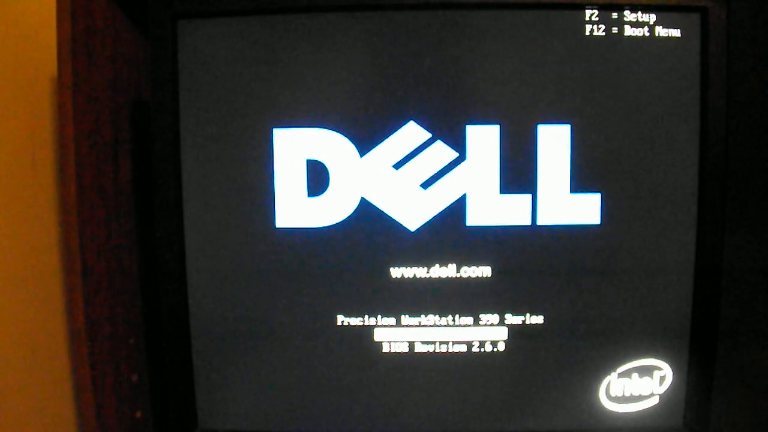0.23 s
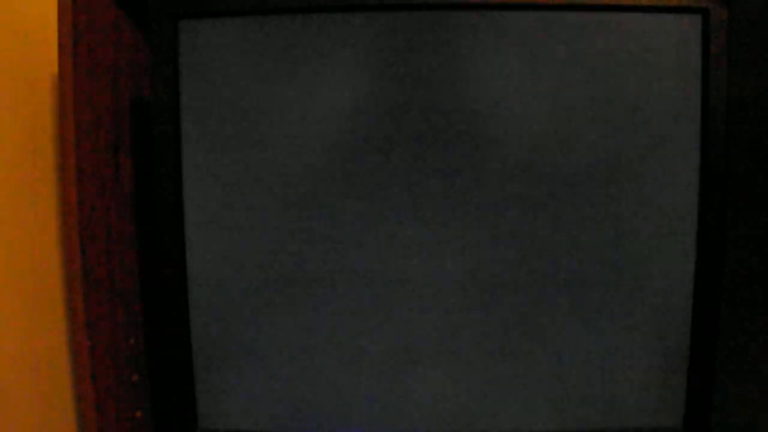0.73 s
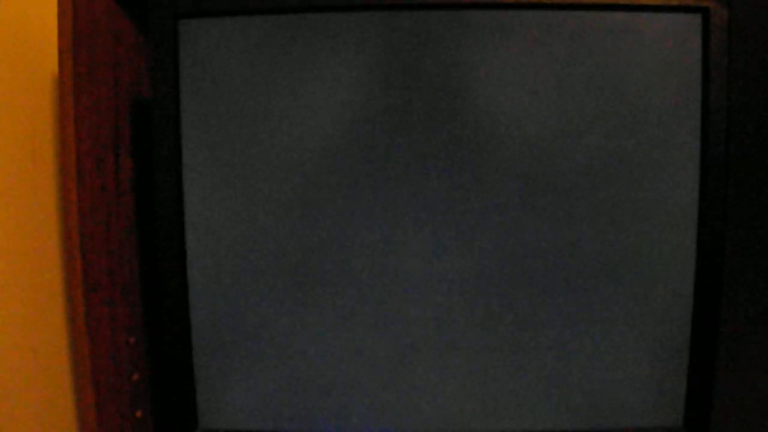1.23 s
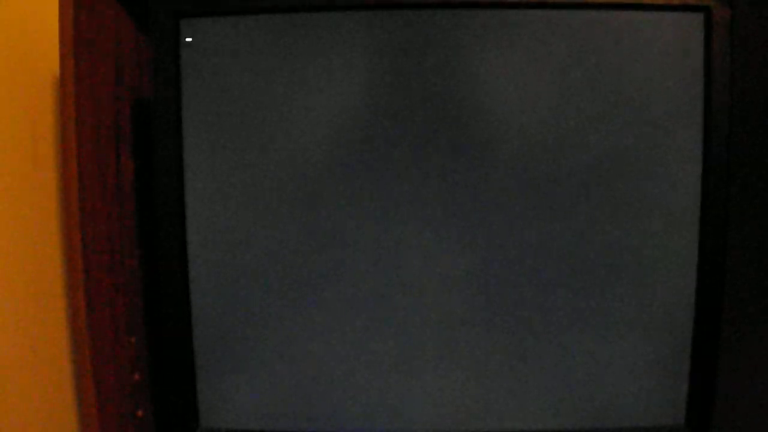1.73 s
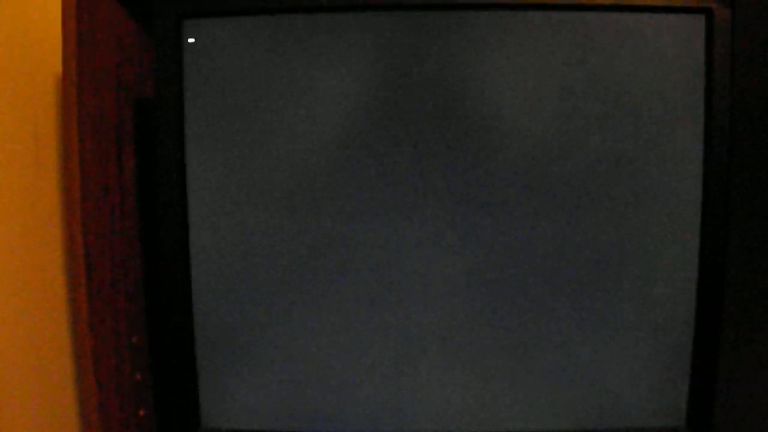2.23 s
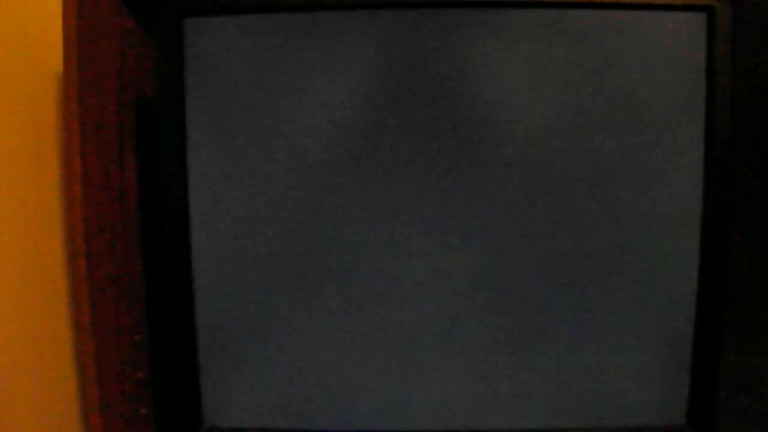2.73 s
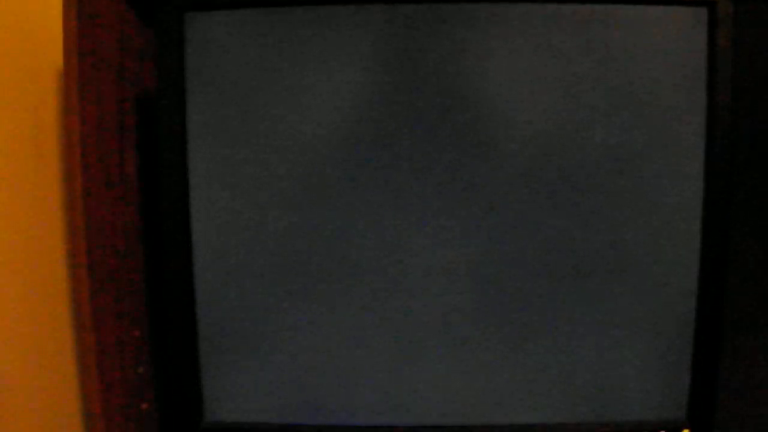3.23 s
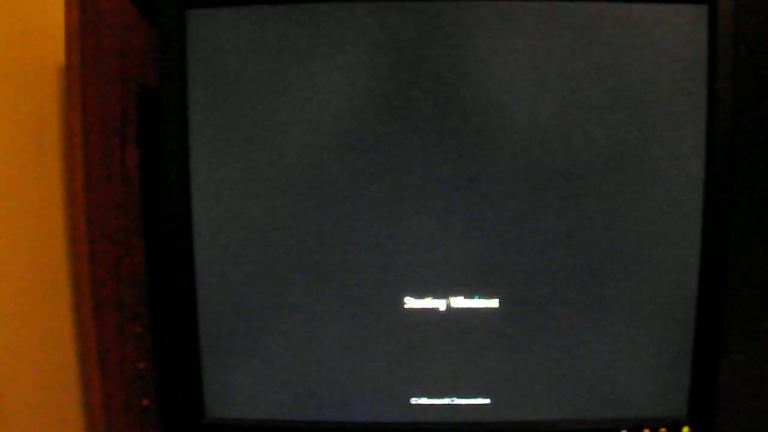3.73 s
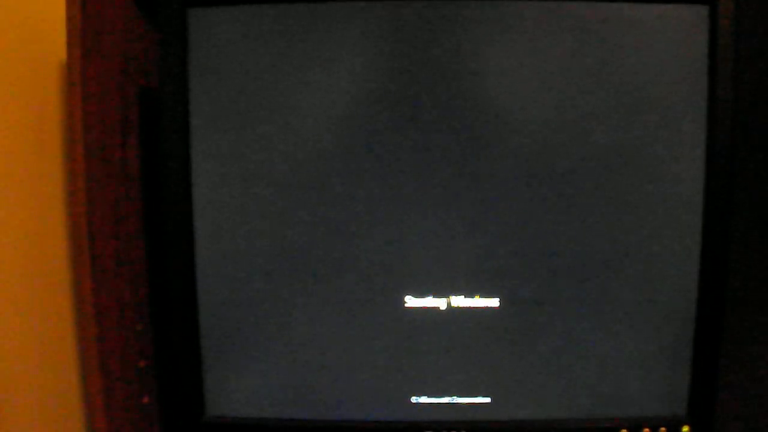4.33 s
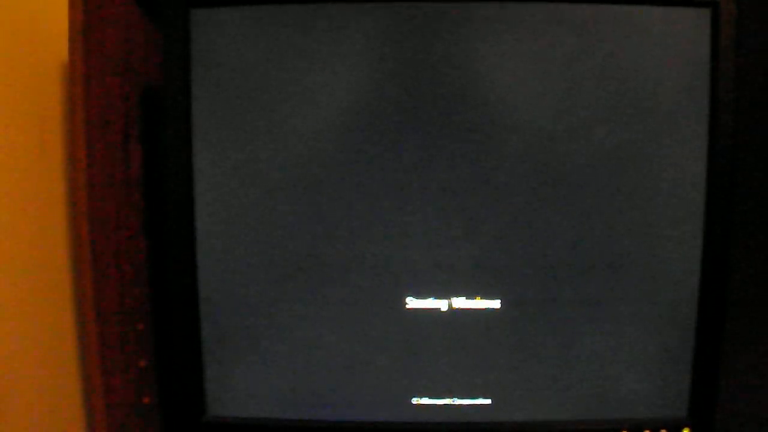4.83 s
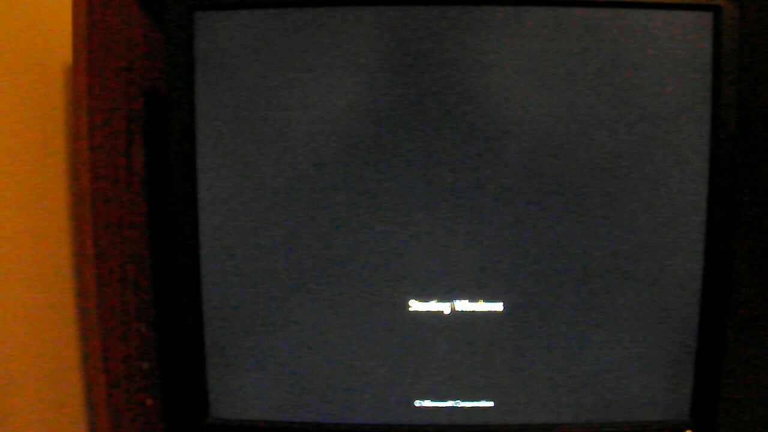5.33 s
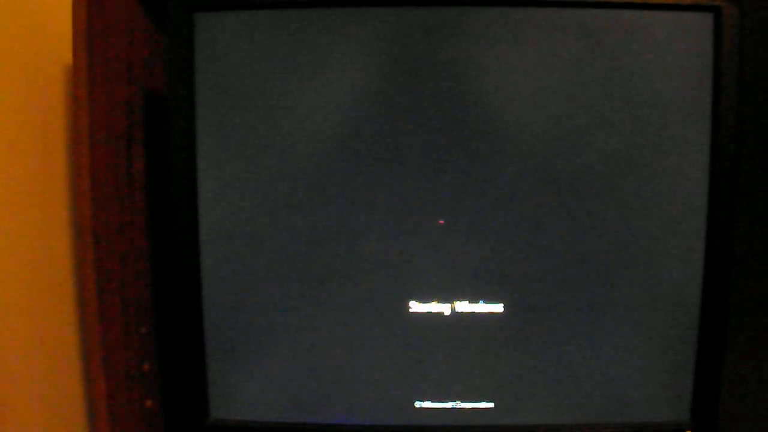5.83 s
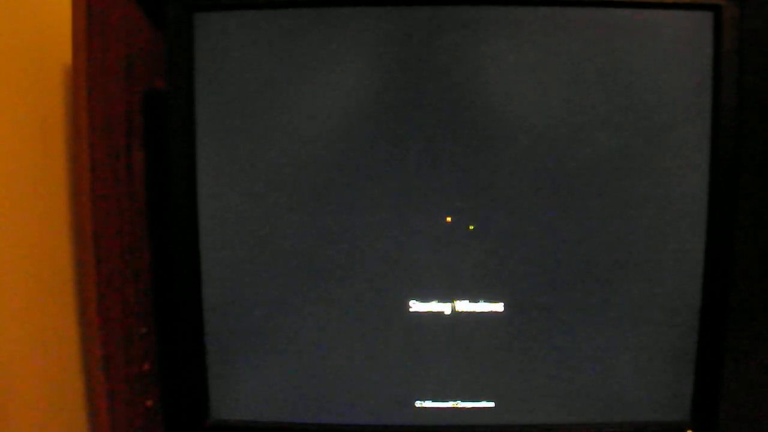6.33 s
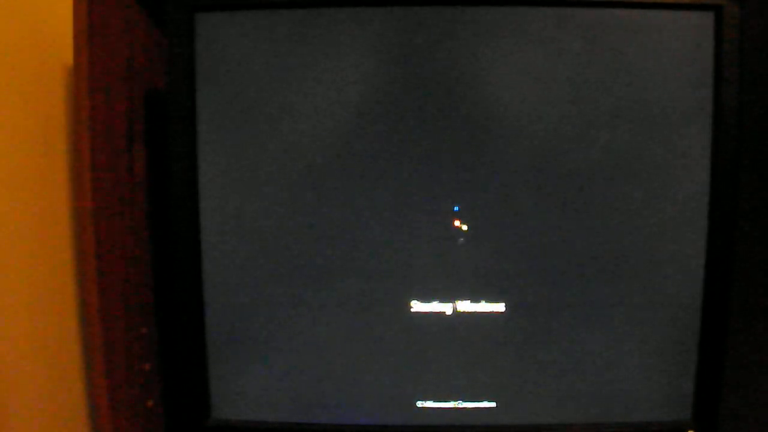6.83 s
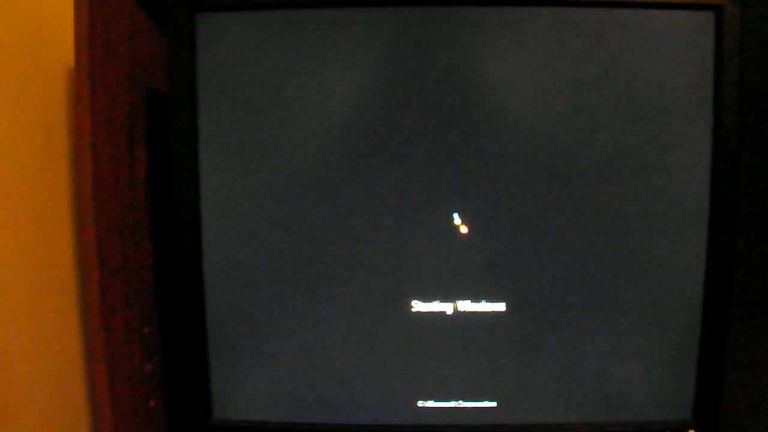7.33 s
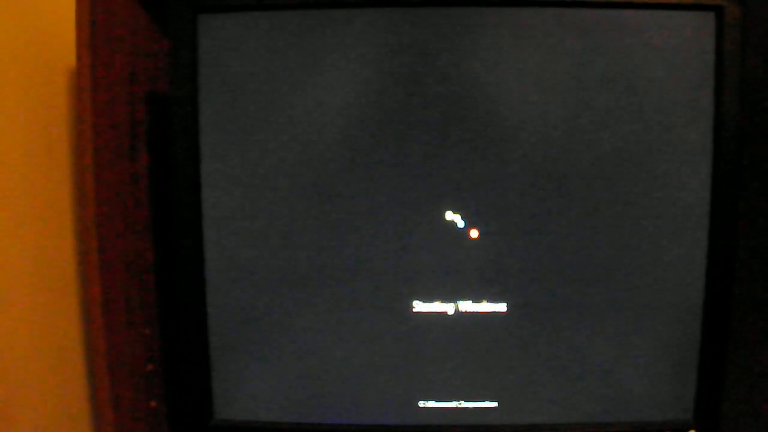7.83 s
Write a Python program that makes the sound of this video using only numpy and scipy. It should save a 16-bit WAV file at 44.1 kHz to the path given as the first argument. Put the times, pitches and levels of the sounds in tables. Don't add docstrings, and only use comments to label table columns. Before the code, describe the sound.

Steady computer fan noise with low rumble and thin whine, soft disk ticks, a few plastic knocks, then a sliding tray snapping shut.

```python
import sys
import numpy as np
from scipy import signal
from scipy.fft import rfft, irfft
from scipy.io import wavfile
from scipy.ndimage import uniform_filter1d

SR = 44100
rng = np.random.default_rng(int(sys.argv[2]) if len(sys.argv) > 2 else 0)


def how_loud(loudness_db):
    steps = np.asarray(loudness_db, float) / 20
    return 10 ** steps


def store_wav(level_fs):
    pcm = np.round(np.clip(np.atleast_2d(level_fs), -1, 1) * 32767)
    wavfile.write(sys.argv[1], SR, pcm.T.astype(np.int16))


N = 355887


def evened(x):
    return x / np.sqrt(np.mean(x ** 2) + 1e-20)


def curve(rows, column):
    rows = np.asarray(rows)
    return np.interp(np.arange(N) / SR, rows[:, 0], rows[:, column])


def hold(start_s, length_s, edge_s):
    t = np.arange(0, N / SR, .001)
    nearest_edge_s = np.minimum(t - start_s, start_s + length_s - t)
    return np.sin(np.pi / 2 * np.clip(nearest_edge_s / edge_s + .5, 0, 1)) ** 2


def spread(slow):
    return np.interp(np.arange(N) / SR * 1000, np.arange(len(slow)), slow)


def add(mix, start_s, sound):
    part = mix[round(start_s * SR):][:len(sound)]
    part += sound[:len(part)]


def coloured(points, band):
    hz = np.fft.rfftfreq(N, 1 / SR)
    point_hz, point_db = np.transpose(points)
    gain = how_loud(np.interp(np.log(hz + 1), np.log(point_hz + 1), point_db))
    gain = gain * (hz >= band[0]) * (hz < band[1])
    return evened(irfft(gain * rfft(rng.standard_normal(N)), N))


def resonate(x, hz, width_hz):
    turn = np.exp(2j * np.pi * np.cumsum(hz * np.ones(len(x))) / SR)
    r = np.exp(-np.pi * abs(width_hz) / SR)
    smooth = signal.lfilter([(1 - r) ** 2], [1, -2 * r, r * r], x / turn)
    return 2 * (turn * smooth).real


def ring(modes, rise_s):
    t = np.arange(6000) / SR
    body = sum(how_loud(db - 60 * t / t60_s) * np.sin(2 * np.pi * hz * t) for hz, db, t60_s in modes)
    sound = body * (1 - np.exp(-(t / rise_s) ** 2))
    return sound / abs(sound).max()


def burst(bands, rise_s, t60_s):
    t = np.arange(6000) / SR
    puff = rng.standard_normal(6000) * (1 - np.exp(-t / rise_s)) * how_loud(-60 * t / t60_s)
    sound = sum(how_loud(db) * resonate(puff, hz, width) / np.sqrt(width) for hz, width, db in bands)
    return sound / abs(sound).max()


def room_modes():
    # frequency_hz, density_db
    rumble = [(4, -27), (12, -13), (18, -8), (23, 0), (29, -15), (48, -12), (56, -8.5), (66, -22),
              (78, -24.5), (98, -28.5), (126, -30), (134, -27), (144, -38.5), (160, -44.5)]
    # from_hz, to_hz, level_db
    between = [(6, 14, -32), (28.6, 43, -38), (64, 70, -46)]
    # start_s, length_s, level_db
    low_surges = [(0.552, 0.041, -21), (0.863, 0.17, -20), (1.277, 0.29, -21.5), (2.128, 0.38, -22.5),
                  (2.639, 0.034, -21), (2.766, 0.06, -22), (3.142, 0.12, -22), (3.558, 0.069, -23.5),
                  (3.87, 0.057, -23.5), (4.07, 0.054, -21), (4.228, 0.093, -20.5), (4.406, 0.094, -22),
                  (4.655, 0.074, -23), (4.848, 0.038, -21.5), (5.105, 0.045, -23.5), (5.23, 0.031, -25),
                  (5.638, 0.18, -23), (5.89, 0.046, -21), (6.053, 0.03, -22), (6.189, 0.16, -22),
                  (6.662, 0.035, -21), (6.784, 0.039, -21.5), (7.019, 0.04, -21), (7.366, 0.16, -19),
                  (7.76, 0.28, -22)]
    # start_s, length_s, level_db
    second_surges = [(0.468, 0.189, -28), (0.887, 0.05, -30), (1.458, 0.034, -33), (1.593, 0.055, -26.5),
                     (1.949, 0.086, -30.5), (2.154, 0.2, -33), (2.414, 0.055, -27.5), (2.633, 0.064, -26.5),
                     (2.787, 0.07, -27), (2.996, 0.17, -26.5), (3.711, 0.31, -29), (4.231, 0.154, -32),
                     (4.461, 0.065, -34), (5.291, 0.11, -31), (5.511, 0.29, -29), (5.866, 0.089, -25.5),
                     (6.173, 0.034, -27), (6.46, 0.062, -29), (6.598, 0.029, -38), (6.718, 0.065, -27.5),
                     (6.887, 0.038, -32), (7.019, 0.057, -26.5), (7.153, 0.33, -28), (7.552, 0.084, -26.5),
                     (7.895, 0.12, -27.5)]
    out = how_loud(-44) * coloured(rumble, (70, 160))
    for from_hz, to_hz, level_db in between:
        out += how_loud(level_db) * coloured(rumble, (from_hz, to_hz))
    for band_hz, calm_db, surges in (((14, 29), -29.5, low_surges), ((43, 64), -35, second_surges)):
        flutter = coloured(rumble, band_hz)
        envelope = uniform_filter1d(abs(signal.hilbert(flutter)), size=3000)
        full = evened(flutter / (envelope + 0.25))
        shapes = [hold(start_s, length_s, 0.03) for start_s, length_s, _ in surges]
        calm = spread(1 - np.minimum(sum(shapes), 1))
        surge = spread(sum(how_loud(row[2]) * shape for row, shape in zip(surges, shapes)))
        out += how_loud(calm_db) * calm * (.5 * flutter + .5 * full)
        out += full * surge
    return out * np.minimum(.3 + np.arange(N) / SR / .03, 1)


def fans():
    # frequency_hz, density_db
    air = [(161, -1), (194, -5), (258, -6.5), (450, -12), (700, -15.5), (904, -16), (1023, -13),
           (1249, -16.5), (1453, -16), (1604, -12.5), (1798, -18.5), (1927, -13.5), (2089, -10),
           (2293, -12)]
    # frequency_hz, density_db
    grille = [(2304, -15), (2358, -14.5), (2412, -11), (2498, -11), (2675, -4), (2790, -15), (2850, -17),
              (2885, -8), (2982, -5.5), (3198, -8.5), (3413, 0), (3628, -4), (3725, -12), (3779, -20)]
    # frequency_hz, density_db
    vent = [(3790, -6), (3840, -2.5), (3919, -7.5), (3973, -1.5), (4016, -.5), (4360, -.5), (4813, -12.5),
            (5200, -11), (5685, -15), (5986, -15.5), (6492, -18)]
    # time_s, level_db
    gust = [
        (0, -0.5),
        (4, -1),
        (5.7, 0.1),
        (7.4, .7),
        (8.07, -0.5),
    ]
    gust_db = curve(gust, 1)
    rush = how_loud(-54.7) * coloured(air, (160, 2300))
    rush += how_loud(-47 + gust_db) * coloured(grille, (2300, 3780))
    rush += how_loud(-59 + .5 * gust_db) * coloured(vent, (3780, 6500))
    z = signal.stft(rush, nperseg=512, noverlap=384)[2]
    patches = uniform_filter1d(rng.standard_normal(z.shape), size=8, axis=0)
    patches = evened(uniform_filter1d(patches, size=16, axis=1))
    return signal.istft(z * how_loud(0.71 * patches), nperseg=512, noverlap=384)[1][:N]


def tones():
    # pitch_hz, level_db
    coils = [
        (2873.8, -64),
        (6017, -90),
        (11472.6, -85.5),
    ]
    # start_s, length_s, lift_db
    loads = [
        (.85, 2.85, 5),
        (6.12, 0.51, 7),
        (6.12, 0.86, 6),
    ]
    t = np.arange(N) / SR
    drifts_hz = np.geomspace(.5, 8, 12)
    wander = evened(sum(np.sin(2 * np.pi * (f * t + rng.random())) / np.sqrt(f) for f in drifts_hz))
    lift_db = spread(sum(db * hold(start_s, length_s, .1) for start_s, length_s, db in loads))
    hum = how_loud(-52.5 + lift_db + wander) * np.sin(2 * np.pi * 120.1 * t)
    whine = sum(how_loud(db) * np.sin(2 * np.pi * hz * t) for hz, db in coils)
    return np.sqrt(2) * (hum + whine)


def microphone_hiss():
    # frequency_hz, density_db
    hiss = [(3820, -31), (6500, -1), (10800, -1.5), (11500, -2), (12400, -4), (15100, -4.5), (15600, -4)]
    return how_loud(-66) * coloured(hiss, (6500, 16000))


def frame_leak():
    frame_hz, first_s, pulse_s, pair_s = 29.49529, .004757, .000563, .000687
    hz = np.arange(frame_hz, SR / 2, frame_hz)
    delay = lambda s: np.exp(-2j * np.pi * hz * s)
    edges = (1 - delay(pulse_s)) * (1 + how_loud(-2.5) * delay(pair_s)) * delay(first_s)
    cycle = 16384
    wave = irfft(np.r_[0, edges / (1 + (hz / 22000) ** 2)], cycle) * cycle * frame_hz / SR
    phase = np.arange(N) / SR * frame_hz % 1
    return how_loud(-40) * np.interp(phase * cycle, np.arange(cycle), wave)


def disk_seeks():
    # start_s, rms_db, length_s, pitch_hz
    seeks = [
        (.29, -57, .025, 4500),
        (0.462, -46, 0.058, 3420),
        (0.658, -52.5, 0.023, 3420),
        (0.764, -45, 0.066, 3300),
        (1.156, -47, 0.043, 3420),
        (1.457, -49, 0.044, 3410),
        (3.046, -49, 0.023, 3480),
        (3.871, -44.5, 0.034, 3460),
        (6.515, -41, 0.027, 3360),
        (7.375, -52, 0.024, 3400),
    ]
    out = np.zeros(N)
    for start_s, rms_db, length_s, pitch_hz in seeks:
        whirr = evened(resonate(rng.standard_normal(6000), pitch_hz, 350))[:round(length_s * SR)]
        add(out, start_s, how_loud(rms_db) * whirr * signal.windows.tukey(len(whirr), .5))
    return out


def taps():
    # start_s, low_db, low_hz, middle_hz, middle_relative_db
    blows = [
        (.342, -55, 460, 800, -11),
        (.975, -41.5, 227, 304, -6),
        (1.609, -43.5, 303, 1250, 0),
        (1.714, -48.5, 550, 304, 3),
        (1.803, -48, 553, 317, -4),
        (1.922, -41, 303, 1250, -3),
        (6.661, -51, 441, 830, 2),
        (6.72, -50, 246, 830, -2),
        (7.843, -49, 260, 333, -15),
        (7.882, -49, 270, 202, -2),
    ]
    out = np.zeros(N)
    for start_s, db, low_hz, mid_hz, mid_db in blows:
        low = ring([(low_hz, 0, .11), (1.215 * low_hz, -6, .07)], 0.003)
        mid = ring([(mid_hz, 0, .065), (.85 * mid_hz, -11, .05), (1.1 * mid_hz, -12, .04)], .005)
        thud = burst([(low_hz, 300, 0), (mid_hz, 500, mid_db)], .002, .08)
        add(out, start_s, how_loud(db) * (low + how_loud(mid_db) * mid + how_loud(-7) * thud))
    return out


def clacks():
    # start_s, level_db, pitch_hz, edge_db, t60_s
    contacts = [
        (1.609, -34.5, 3020, -36, 0.055),
        (1.718, -33, 3200, -39, 0.039),
        (1.806, -37, 3040, -47, 0.07),
        (1.9225, -37, 3040, -38, 0.07),
        (6.6638, -30.5, 3020, -38.5, 0.057),
    ]
    edge_bands = [(586, 540, 1.5), (1500, 740, 3), (2110, 1400, 2), (4600, 1500, -21)]  # Hz, width Hz, dB
    out = np.zeros(N)
    for start_s, db, hz, edge_db, t60_s in contacts:
        modes = [(hz, 0, t60_s), (0.79 * hz, -5, .04), (1.3 * hz, -14, .03)]
        add(out, start_s, how_loud(db) * ring(modes, 0.0025))
        add(out, start_s, how_loud(edge_db) * burst(edge_bands, 0.00041, 0.023))
    return out


def disk_ticks():
    # start_s, peak_db, bright_relative_db
    parkings = [
        (2.931, -28.5, -11.5),
        (6.4826, -33.5, -8),
        (7.3422, -37, -4),
    ]
    # pitch_hz, level_db, t60_s
    body_modes = [(3230, 4.5, 0.078), (3306, 5, 0.075), (3420, -12, .07), (3260, -9, .08), (3500, -2, .1)]
    # pitch_hz, width_hz, level_db
    arm_bands = [(4150, 190, 6), (5070, 740, -1.5), (5150, 600, -1)]
    out = np.zeros(N)
    t = np.arange(6000) / SR
    snap = np.exp(-((t - .0005) / 0.00027) ** 2) * np.sin(2 * np.pi * 4500 * t)
    for start_s, peak_db, bright_db in parkings:
        bright = how_loud(-1) * burst(arm_bands, 0.00047, 0.082) + how_loud(7.5) * snap
        add(out, start_s - .0004, how_loud(peak_db) * (ring(body_modes, 0.0017) + how_loud(bright_db) * bright))
    return out


def tray():
    # time_s, pitch_hz
    slide = [
        (5.8, 439),
        (5.97, 432),
        (6.07, 400),
        (6.2, 404),
        (6.4, 436),
        (6.52, 428),
        (6.66, 400),
    ]
    # pitch_hz, width_hz, level_db
    body_bands = [(153.4, 45, 11), (184, 73, 3), (260, 25, -7.5), (585, 94, -7.5), (1210, 330, -11.5),
                  (2180, 660, -4)]
    # start_s, scrape_db, rim_db
    shoves = [
        (5.82, -44.5, -68),
        (5.96, -50, -61),
        (6.26, -49, -63),
    ]
    t = np.arange(N) / SR
    unevenness_db = 1.2 * evened(uniform_filter1d(rng.standard_normal(N), size=400))
    grains = rng.standard_normal(N) * how_loud(unevenness_db)
    body = evened(sum(how_loud(db) * evened(resonate(grains, hz, width)) for hz, width, db in body_bands))
    panel_hz = curve(slide, 1)
    rim = evened(resonate(grains, 1.76 * panel_hz, 220))
    panel = resonate(rng.standard_normal(N), panel_hz, 45)
    panel = evened(panel / uniform_filter1d(abs(panel), size=900))
    scrape, rub = how_loud(-51.5), how_loud(-65.5)
    for start_s, scrape_db, rim_db in shoves:
        since_s = np.maximum(t - start_s, 0)
        shove = (1 - np.exp(-since_s / 0.038)) * how_loud(-60 * since_s / 0.84 + 6)
        scrape = np.hypot(scrape, how_loud(scrape_db) * shove)
        rub = np.hypot(rub, how_loud(rim_db) * shove)
    parts = scrape * body + how_loud(-57.5) * panel + rub * rim
    return spread(hold(5.83, .83, 0.047)) * parts


def latch():
    # pitch_hz, width_hz, level_db
    case_modes = [(420, 62, -9), (500, 88, 1.5), (675, 100, -7), (1050, 150, -3), (1330, 240, -9),
                  (1850, 200, -5), (2250, 180, 1), (3300, 86, 8.5), (4340, 300, 2), (5100, 300, -3)]
    out, t = np.zeros(N), np.arange(4000) / SR
    strike = np.zeros(4000)
    for hz, width_hz, db in case_modes:
        strike -= how_loud(db) * np.exp(-np.pi * width_hz * t) * np.sin(2 * np.pi * hz * t)
    strike = uniform_filter1d(strike * (1 - np.exp(-t / .0003)), size=5)
    add(out, 6.662, how_loud(-28) * strike / abs(strike).max())
    return out


def scene():
    steady = room_modes() + fans() + tones()
    events = disk_seeks() + taps() + clacks() + disk_ticks() + tray() + latch()
    return (steady + events)[None]


def roll_off(x):
    return signal.sosfilt(signal.butter(12, 15730, fs=SR, output="sos"), x)


def record(dry):
    mix = dry + microphone_hiss() + frame_leak()
    return roll_off(mix)


dry = scene()
out = record(dry)
store_wav(out)
```